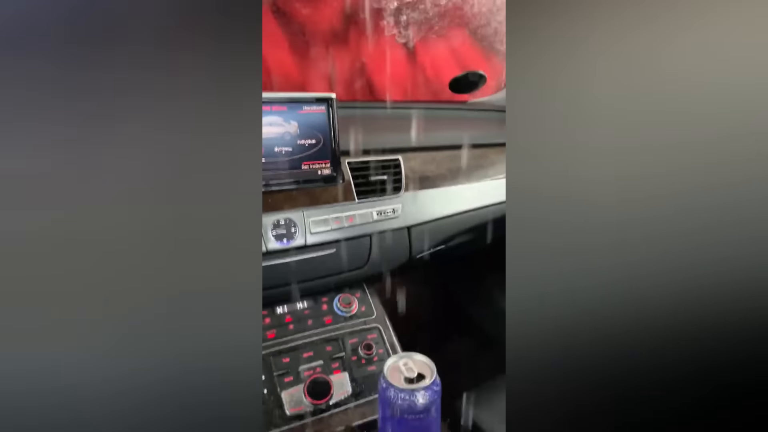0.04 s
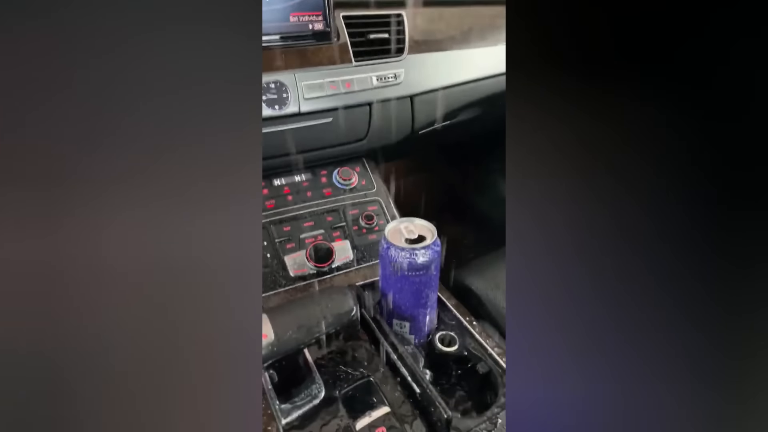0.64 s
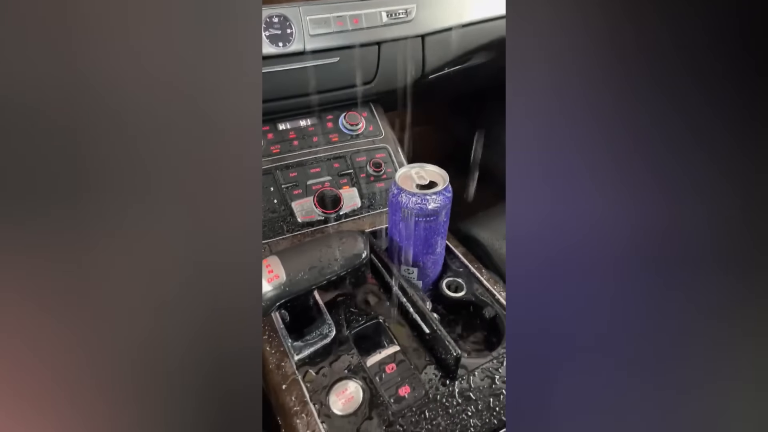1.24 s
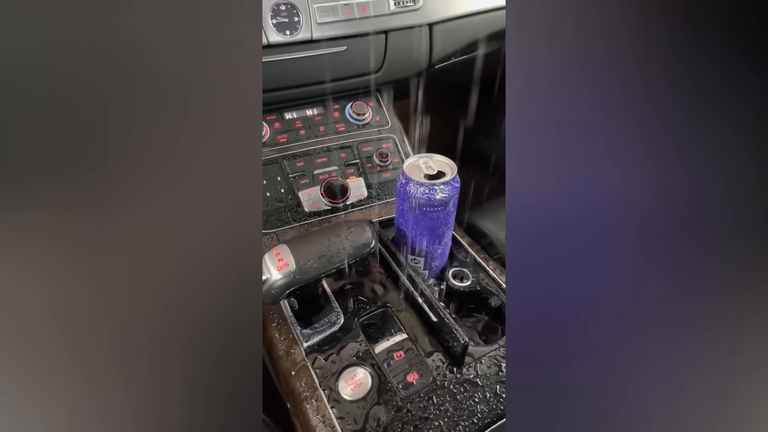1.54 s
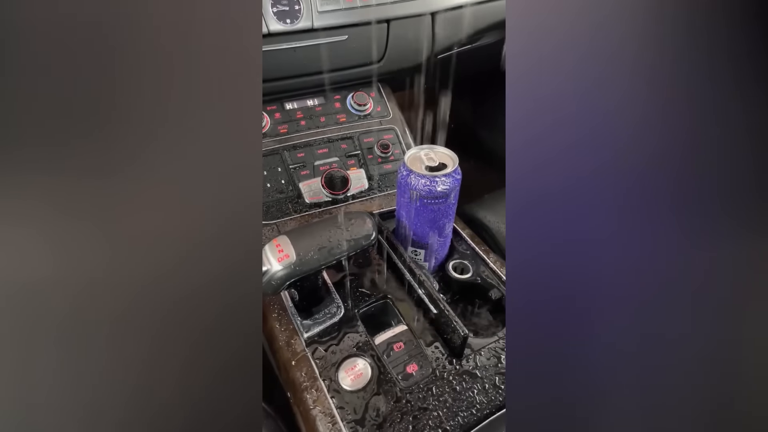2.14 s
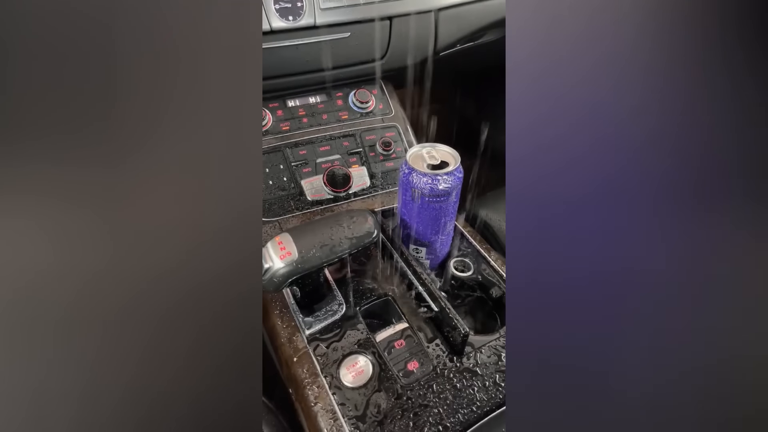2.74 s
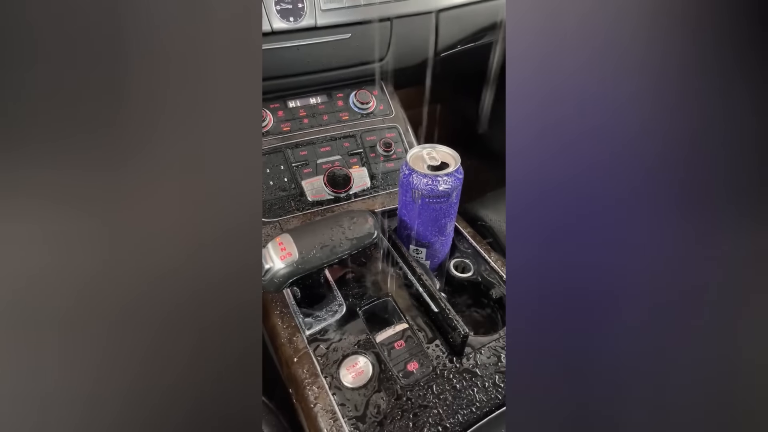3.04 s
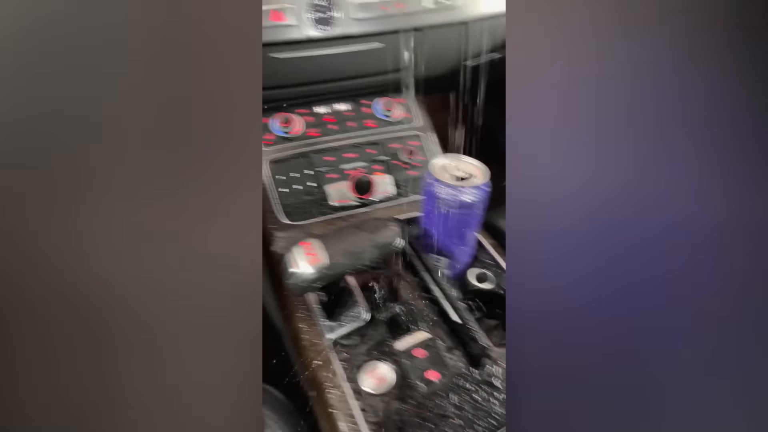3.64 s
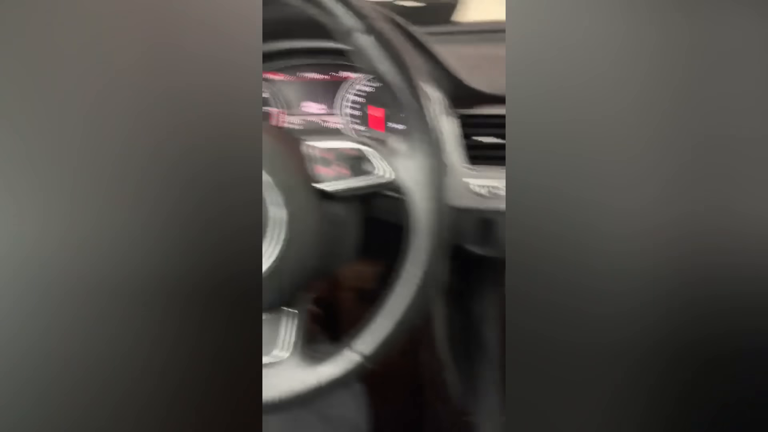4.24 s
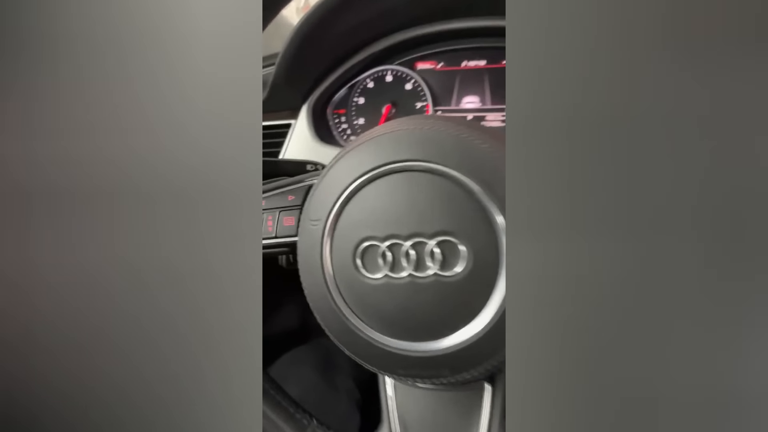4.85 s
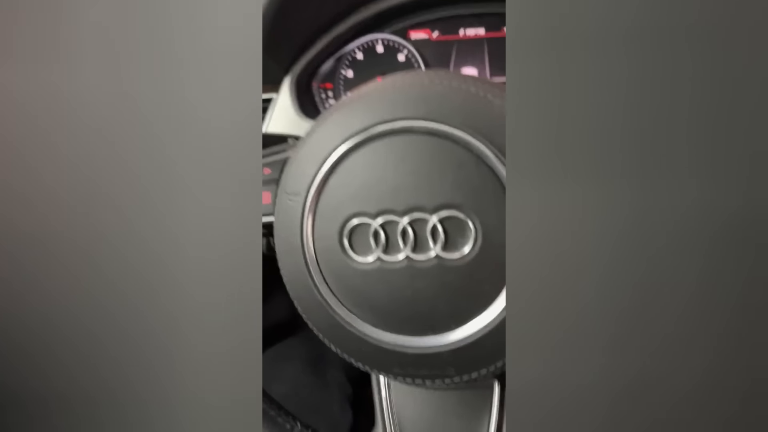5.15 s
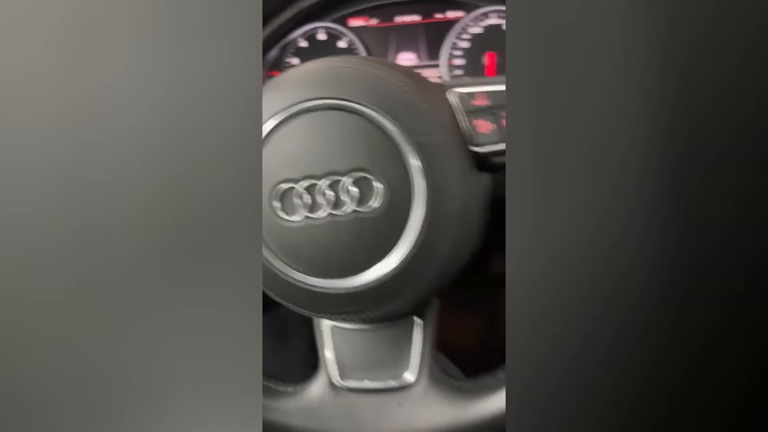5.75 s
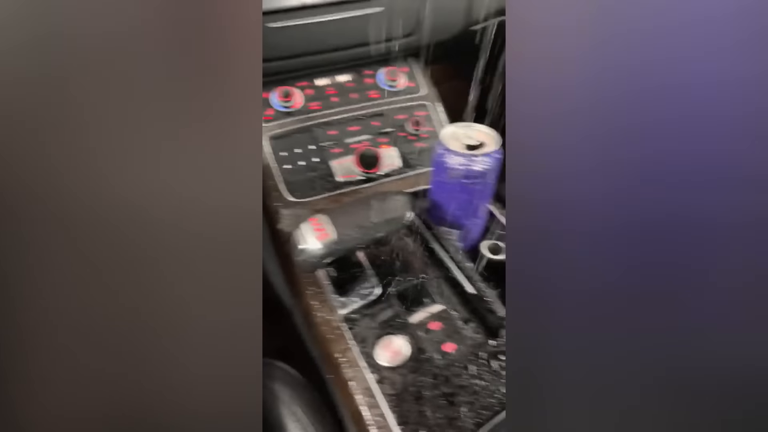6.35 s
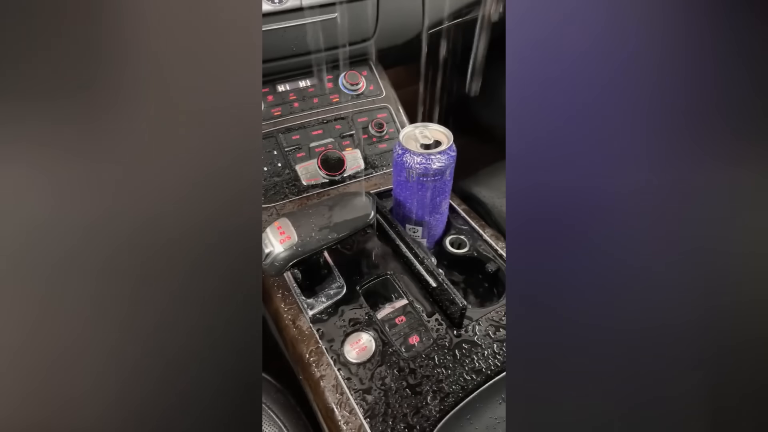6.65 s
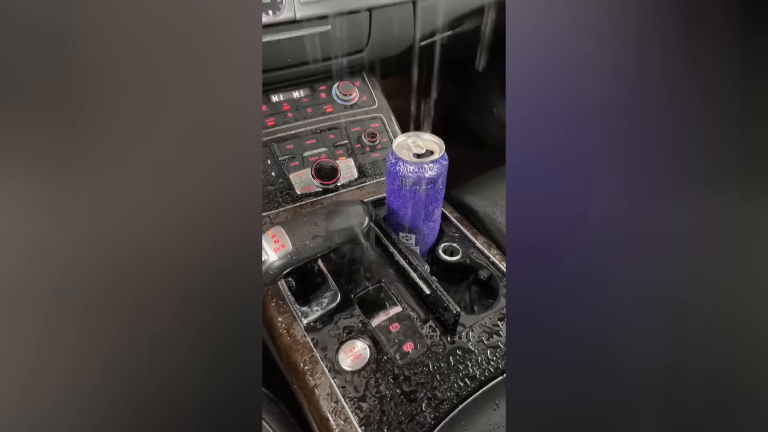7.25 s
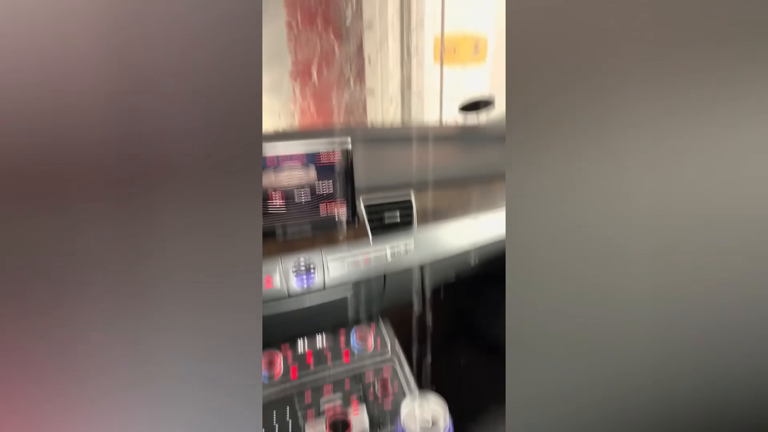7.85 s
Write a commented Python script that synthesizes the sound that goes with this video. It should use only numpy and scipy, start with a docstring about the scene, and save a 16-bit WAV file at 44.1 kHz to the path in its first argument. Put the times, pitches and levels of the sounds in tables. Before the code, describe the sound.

Close drips tick, pat and plink on a car's plastic console as water streams in through the roof, picked up by a phone in the small, dry-sounding cabin. It opens with a loud run of wet cloth thumps and splashes on the body, followed by one short rubber squeak. The dripping then grows lighter, and fine spray swells a few times in the second half. The idling engine and the car wash rumble underneath throughout.

```python
"""Leaking roof in a car wash

Inside an idling car, water leaks through the roof and drums on the hollow centre console.
Drops tick on plastic, pat on wet trim and plink into puddles, close to a phone held in the
small padded cabin. Wet cloths beat the body for the first second and rubber squeaks once;
the wash rumbles and sprays outside."""
import sys
import numpy as np
from scipy import signal
from scipy.fft import rfft, irfft
from scipy.io import wavfile
from scipy.ndimage import uniform_filter1d

SR = 44100
rng = np.random.default_rng(int(sys.argv[2]) if len(sys.argv) > 2 else 0)


def generate_wav(signal):
    """Clip the signal to [-1, 1] and save it as 16-bit WAV at the path in sys.argv[1]."""
    frames = np.transpose(np.atleast_2d(signal))
    scaled = np.clip(frames, -1, 1) * 32767
    pcm = np.round(scaled).astype(np.int16)
    wavfile.write(sys.argv[1], SR, pcm)


N = 356762
TIME_S = np.arange(N) / SR
FREQ_HZ = np.maximum(np.arange(N // 2 + 1) * SR / N, 1)
BRIEF_S = TIME_S[:2048]  # time axis of one drop or cabin response
BRIEF_HZ = np.arange(len(BRIEF_S) // 2 + 1) * SR / len(BRIEF_S) + 1

# drops on hard plastic: start_s, level_db, ring_hz, splash_re_impact_db
PLASTIC_DROPS = [(0.0427, -27.5, 8000, 11.5), (0.0958, -12.5, 8260, -4), (0.2715, -19.5, 6980, -11),
                 (0.345, -20, 9900, -22), (0.4955, -5, 9600, -11), (0.604, -8.5, 10340, -16),
                 (0.6387, -20, 10000, -3), (.782, -14.5, 9200, -3), (0.81, -23, 7660, 7.5),
                 (0.952, -18, 9400, -7), (1.1676, -24, 6650, -4), (1.2278, -21.5, 9650, 1.5),
                 (1.3166, -30, 10700, 1), (1.403, -17.5, 8600, -6), (1.59, -15.5, 6000, 1),
                 (1.8248, -25.5, 10700, -1), (2.0535, -30, 10800, -9), (2.224, -26, 9650, -15),
                 (2.294, -24, 10200, -1), (2.337, -11.5, 8640, -7), (2.432, -28, 9750, -14),
                 (2.522, -30, 6600, 9), (2.674, -21.5, 7050, -2), (2.702, -16.5, 9250, -11),
                 (2.782, -34.5, 7040, 10), (2.8509, -33, 10200, -7), (2.8705, -13, 9600, -0.5),
                 (2.889, -19.5, 10000, 2), (3.088, -22.5, 9000, 1.5), (3.134, -20, 9700, -5),
                 (3.184, -26, 11100, -21), (3.492, -20, 10800, -1), (3.585, -29, 6760, 11.5),
                 (3.788, -20.5, 8250, -10), (3.9474, -20, 10500, -15), (4.0173, -27.5, 6150, -3),
                 (4.1547, -12.5, 10130, -27), (4.606, -11, 9600, -4.5), (4.6415, -26, 10600, -13),
                 (4.8349, -28, 11200, -6), (5.0226, -24, 10000, 2.5), (5.391, -24, 9900, -6),
                 (5.4127, -18.5, 7050, -3), (5.859, -17, 10600, -3), (5.985, -19.5, 11200, -12),
                 (6.336, -22.5, 6940, 2), (6.503, -20, 9650, -5), (6.5684, -21, 10000, -3),
                 (6.7206, -29, 11200, 0), (6.788, -31.5, 11000, -7), (6.845, -30, 10130, 2),
                 (6.892, -18, 9690, -25), (6.9392, -23.5, 11200, 5.5), (7.009, -34.5, 7200, 8),
                 (7.127, -32, 11370, 1), (7.1587, -24, 11000, -3), (7.236, -23.5, 11300, -9),
                 (7.39, -32.5, 11500, 5), (7.5665, -7, 10470, -1), (7.766, -23, 10800, -15),
                 (7.936, -11, 10300, -5)]
# drops into standing water: start_s, level_db, nominal_hz, splat_re_bubble_db, nominal_cycles
PUDDLE_DROPS = [(.237, -17, 600, -14, 6.4), (.352, -21, 4800, -14, 7), (1.4766, -11.5, 4800, -6.5, 6.6),
                (2.18, -23.5, 2550, -3, 3), (2.335, -27.5, 3960, 2, 5), (3.326, -27, 1100, -4, 3),
                (3.343, -20, 1020, -15, 2.4), (3.638, -27.5, 3340, -13, 7), (3.8894, -16.5, 2680, -10, 2.5),
                (4.896, -35, 2870, -10, 7), (5.16, -34, 1470, 2, 6), (5.724, -32.5, 3680, -8, 13),
                (6.017, -29.5, 2780, -11, 6), (6.316, -26, 2420, 0.5, 9.9),
                (6.6189, -17.5, 2520, -10.5, 5.2), (7.217, -20.5, 3320, -3, 9.6)]
# drops on wet trim, no bubble: start_s, level_db, centre_hz, decay_s
TRIM_DROPS = [(0.213, -36.5, 3000, 0.0056), (1.061, -41, 3000, 0.0026), (1.382, -40, 1990, 0.0025),
              (1.589, -39, 2270, .003), (1.902, -38, 2110, .003), (2.06, -45, 2200, 0.0023),
              (2.109, -41, 3800, 0.0018), (2.301, -41, 2000, .002), (2.532, -40, 2300, .003),
              (2.635, -45, 2100, .002), (2.703, -39, 2100, 0.0016), (2.778, -40, 1900, .003),
              (2.7998, -31, 1340, 0.0023), (2.871, -32.5, 3160, 0.0028), (3.13, -28.5, 1430, 0.0011),
              (3.301, -39, 1900, 0.003), (3.393, -38, 3000, 0.0018), (3.49, -35, 1900, 0.0018),
              (3.588, -28.5, 1070, 0.0019), (3.735, -43, 2200, .003), (4.397, -35, 2090, 0.0044),
              (4.756, -36, 3800, 0.0055), (5.075, -44, 1980, .003), (5.381, -37, 3700, 0.0035),
              (5.651, -34, 4000, 0.0047), (6.086, -37, 2570, 0.0033), (6.309, -30.5, 2500, 0.0021),
              (6.335, -34, 2700, 0.0021), (6.453, -39, 2200, .002), (6.586, -36.5, 2220, 0.0025),
              (6.679, -40, 2400, 0.0017), (6.793, -36, 2580, 0.0013), (6.846, -37.5, 1190, .003),
              (6.911, -39, 1200, 0.0026), (6.94, -38.5, 2600, 0.0033), (7.009, -32, 2330, 0.0019),
              (7.119, -36, 1180, 0.004), (7.132, -36, 2480, 0.0021), (7.199, -35, 1200, 0.0023),
              (7.333, -37.5, 2510, 0.0023), (7.392, -31.5, 1280, 0.0018), (7.491, -40, 1160, 0.0027),
              (7.551, -41, 2300, .002), (7.795, -38, 2090, 0.0017), (7.969, -38, 2290, 0.0024)]
# leak strength: time_s, level_db
LEAK_FLOW = [(0, -32), (1.05, -37), (2, -37.5), (2.6, -39), (3.5, -40), (4.7, -42), (5.3, -46.5),
             (5.8, -43.5), (6.7, -45), (7.4, -45), (8.09, -40.5)]
# hollow console resonances: centre_hz, width_hz, level_db
CONSOLE_MODES = [(557, 42, -2.5), (834, 120, -1.5), (1144, 160, 3), (1660, 380, -35), (2230, 390, -8.5),
                 (4150, 1000, -22.5)]
# cloth hits on the body: start_s, boom_db, knock_db, knock_hz, splash_db
CLOTH_SLAPS = [(.003, -15.5, -21, 562, -22), (0.101, -11.5, -23.5, 564, -23), (0.189, -13, -36, 564, -24),
               (.276, -15.5, -17.5, 296.5, -25.5), (0.323, -16, -22, 289, -33),
               (.379, -12.5, -20, 318, -25.5), (.461, -14.5, -25.5, 495, -26.5),
               (.546, -17.5, -21, 347, -24.5), (.626, -14, -19, 312, -30), (.729, -14.5, -34, 522, -28.5),
               (0.825, -13, -23.5, 438, -33)]
# body panel resonances: ratio_to_knock, level_db
PANEL_MODES = [(.76, -7.5), (1, -4.5), (1.27, -10), (1.8, -15.5)]
# surges of fine spray: start_s, length_s, level_db
SPRAY_SURGES = [(3.656, 0.37, -39.5), (4.074, 0.8, -46.5), (5.846, 0.47, -35.5), (7.512, 0.18, -38)]
# noise spectra: freq_hz, level_db
PANEL_SPECTRUM = [(25, -34), (50, -1), (80, 4), (110, 3.5), (132, 12.5), (160, -3), (210, -2), (330, -13.5),
                  (450, -26), (600, -21.5), (900, -49), (2000, -47), (4000, -59), (8000, -80)]
SPLASH_SPECTRUM = [(150, 0.5), (380, 12), (600, 3.5), (1000, -4.5), (1400, -8.5), (1900, -5.5), (2600, -16),
                   (4000, -16), (8000, -22)]
HISS_SPECTRUM = [(600, 9.5), (1600, 2), (2400, 2.5), (3300, 0), (4500, 1), (6500, -1), (8000, 1.5),
                 (11000, -32), (15000, -28)]
FIZZ_SPECTRUM = [(4000, -38), (7000, -16.5), (8500, -14.5), (10200, 0), (11000, -10), (12000, -22),
                 (13500, -23), (16000, -43)]
SURGE_SPECTRUM = [(4000, -22), (7000, -10.5), (8500, -7), (10200, -0.5), (12000, -9), (13500, -11.5),
                  (15000, -20), (16000, -40)]
MACHINE_SPECTRUM = [(20, -32), (35, -28), (65, 5), (100, 0), (140, -5.5), (175, -13), (230, -7.5),
                    (330, -13.5), (460, -25), (600, -21.5), (900, -29.5), (2000, -36), (5000, -59)]
CABIN_BOOM_SPECTRUM = [(60, -34), (88, 4), (122, 7), (152, 10), (185, 5.5), (300, -32)]
# phone heading, 0 = console, 1 = steering wheel: time_s, turn
PHONE_TURN = [(3.4, 0.62), (3.8, 0.75), (4.7, 1), (5.7, 0.91), (6.4, 0.76)]
# sound reaching the two microphone ports from all sides: freq_hz, diffuse_re_common_db
DIFFUSE_SHARE = [(50, -45), (150, -20), (300, -10.5), (520, 6.5), (1000, -3.5), (1800, -15.5), (4000, 10.5),
                 (7000, -32), (9500, -93), (14000, 24)]
# phase between the ports: freq_hz, left_lead_rad
PORT_LEAD = [(100, 0), (250, .2), (420, .7), (600, -1.6), (750, -2.0), (1100, -.9), (1900, .1), (3800, .5),
             (4400, 1.6), (5400, 5.4), (7000, 7.4), (9200, 9.4), (12000, 12.3), (13500, 12.8), (15000, 15)]
# level between the ports: freq_hz, left_minus_right_db
PORT_TILT = [(90, 0), (200, 2.2), (380, 6), (700, 4.5), (1200, .4), (4000, 0)]


def big_drops(tick_gain_db=-5, plink_gain_db=-4, pat_gain_db=1.5, rebound_db=-34):
    """Fat drops hit plastic, puddles and trim; on plastic each throws up a droplet that lands later."""
    ticks, wet = np.zeros((2, N))
    for start_s, level_db, ring_hz, splash_db in PLASTIC_DROPS:
        width_hz = 1900 * 2 ** (splash_db / 13)  # wetter hits damp the ring
        gain = undb(level_db + tick_gain_db)
        add(ticks, start_s, gain * tick(ring_hz, width_hz, splash_db))
        rebound_s = start_s + 0.048 * (0.5 + rng.random())
        add(ticks, rebound_s, gain * undb(rebound_db) * tick(ring_hz, width_hz, splash_db=-5))
    for start_s, level_db, nominal_hz, splat_db, cycles in PUDDLE_DROPS:
        add(wet, start_s, undb(level_db + plink_gain_db) * plink(nominal_hz, splat_db, cycles))
    for start_s, level_db, centre_hz, decay_s in TRIM_DROPS:
        add(wet, start_s, undb(level_db + pat_gain_db) * pat(centre_hz, decay_s))
    return small_source(ticks) + wet


def small_drops():
    """Random patter; ticks grow with the flow, plinks as it thins."""
    ticks, pats, plinks = np.zeros((3, N))
    for when, faintness, pitch in rng.random((640, 3)):
        drop = tick(11200 - 5200 * pitch ** 2, width_hz=1060, splash_db=-10)
        add(ticks, when * N / SR, undb(-37 - 6 * np.log(faintness + 0.23)) * drop)
    for when, faintness, pitch in rng.random((300, 3)):
        drop = pat(1050 * 3.6 ** pitch, decay_s=0.0012)
        add(pats, when * N / SR, undb(-27.5 - 13 * faintness) * drop)
    for when, faintness, pitch in rng.random((160, 3)):
        drop = plink(1000 * 3.4 ** pitch, splat_db=5.5, nominal_cycles=7)
        add(plinks, when * N / SR, undb(-42 - 3.3 * faintness) * drop)
    flow_db = over_time(LEAK_FLOW)
    ticks = small_source(ticks) * undb(0.81 * (flow_db - flow_db.mean()))
    plinks *= undb(0.45 * thinning_db())
    return (ticks + pats + plinks) * facing(console_db=-2, turn_db=-10.5)


def tick(ring_hz, width_hz, splash_db, crack_s=0.0012, splash_s=0.0063, trim_hz=7000):
    """A drop hits plastic: fine snap, tiny ring, crack, then splashed droplets."""
    noise = rng.standard_normal((3, len(BRIEF_S)))
    spot = resonance(BRIEF_HZ, ring_hz, q=ring_hz / (2 * width_hz))
    # broad, heavy hits also wake the trim's resonance
    trim = undb(-11) * width_hz / 1300 * resonance(BRIEF_HZ, trim_hz, q=5)
    band = np.hypot(abs(spot), abs(trim))
    crack, droplets = (unit_rms(irfft(rfft(row) * band)) for row in noise[:2])
    snap = 0.7 * noise[2] * np.exp(-BRIEF_S / 0.0004)
    ring = np.sqrt(2) * bubble(ring_hz, cycles=1.18 * ring_hz / width_hz, glide=0.041, rise_cycles=2.8)
    crack *= 2 * undb(-6) * np.exp(-BRIEF_S / crack_s)
    clumps = unit_rms(undb(7 * unit_rms(uniform_filter1d(noise[2], size=30))))
    splash = np.sqrt(crack_s / splash_s) * clumps * rise_fall(BRIEF_S, crack_s, splash_s)
    return snap + ring + crack + 2 * undb(splash_db) * droplets * splash


def plink(nominal_hz, splat_db, nominal_cycles):
    """A drop enters water: a broad splat and a trapped bubble."""
    cycles = nominal_cycles * min(nominal_hz / 2400, 1) ** 0.5  # large bubbles break after fewer cycles
    ring = bubble(0.976 * nominal_hz, cycles, glide=0.032, rise_cycles=1)
    return ring + undb(splat_db) * splat(nominal_hz, decay_s=0.001, width_ratio=2.6, rise_s=0.0001)


def pat(centre_hz, decay_s):
    """A drop lands on wet trim; softer spots yield more slowly and sound longer."""
    return splat(centre_hz, decay_s, width_ratio=0.72, rise_s=0.067 * decay_s)


def bubble(pitch_hz, cycles, glide, rise_cycles):
    """A trapped bubble rings briefly, its pitch climbing as it nears the surface."""
    elapsed_cycles = pitch_hz * BRIEF_S
    envelope = rise_fall(elapsed_cycles, rise_cycles, cycles)
    climb = 1 + glide * np.tanh(elapsed_cycles / cycles / 2)
    return envelope / envelope.max() * sine(pitch_hz * climb)


def splat(centre_hz, decay_s, width_ratio, rise_s):
    """Water flattens on a surface: a short, broad noise burst."""
    band = resonance(BRIEF_HZ, centre_hz, q=1 / width_ratio) ** 2
    noise = irfft(rfft(rng.standard_normal(len(BRIEF_S))) * band)
    decay_rms = np.sqrt(np.mean(np.exp(-2 * BRIEF_S / decay_s)))
    return unit_rms(noise * rise_fall(BRIEF_S, rise_s, decay_s)) * decay_rms


def small_source(ticks, cutoff_hz=5030):
    """A tiny impact radiates no lows."""
    return signal.sosfilt(signal.butter(3, cutoff_hz, "high", fs=SR, output="sos"), ticks)


def streams(drops_per_s=90):
    """Streams drum on the hollow console: fine beads in full flow, fatter drops as it thins."""
    landings = rng.random((3, N)) < drops_per_s / SR
    size_db = 4.5 * np.minimum(rng.exponential(size=(3, N)), 2.5)
    drops = landings * undb(size_db + 0.24 * thinning_db())
    beads = undb(-33 - thinning_db()) * rng.standard_normal((3, N))
    console = sum((-1) ** k * undb(level_db) * resonance(FREQ_HZ, centre_hz, q=centre_hz / width_hz)
                  for k, (centre_hz, width_hz, level_db) in enumerate(CONSOLE_MODES))
    drumming = at_ports(irfft(rfft(drops + beads) * console, N))
    sway_db = 3 * wander(rate_hz=24)
    return drumming * facing(console_db=-38.2, turn_db=-18.5) * undb(sway_db)


def thinning_db(full_flow_db=-43):
    """Shortfall of the leak below the flow that keeps its streams whole."""
    return np.maximum(full_flow_db - over_time(LEAK_FLOW), 0)


def cloths(swell_s=0.0032, contact_s=0.056, drag_until_s=0.85, slosh_until_s=0.65):
    """Wet cloths slap and drag; panels knock and boom, water splashes and sloshes until shed."""
    blows, knocks, splashes = np.zeros((3, N))
    t = TIME_S[:SR // 3]
    # a cloth pushes while on the panel, then peels off quickly
    blow = (1 - np.exp(-t / swell_s)) * np.exp(-(t / contact_s) ** 4)
    burst = rise_fall(t, 0.0064, 0.014)
    ring = rise_fall(t, 0.009, 0.014)
    for start_s, boom_db, knock_db, knock_hz, splash_db in CLOTH_SLAPS:
        modes = np.zeros(len(t))
        for ratio, level_db in PANEL_MODES:
            mode_hz = knock_hz * ratio * (1 + 0.039 * rng.standard_normal())
            modes += undb(level_db) * np.sin(2 * np.pi * (mode_hz * t + rng.random()))
        add(blows, start_s, undb(boom_db) * blow / blow.max())
        add(knocks, start_s, undb(knock_db) * modes * ring / ring.max())
        add(splashes, start_s, undb(splash_db) * burst / burst.max())
    drag = undb(-23.5 - 34 * np.maximum(TIME_S - drag_until_s, 0))
    slosh = undb(-36.5 - 27 * np.maximum(TIME_S - slosh_until_s, 0))
    panels = noise_field(PANEL_SPECTRUM, grain_db=4)
    # levelled so each blow has its full force
    panels /= np.sqrt(uniform_filter1d(np.mean(panels ** 2, axis=0), size=700))
    water = noise_field(SPLASH_SPECTRUM, grain_db=6)
    return panels * np.hypot(blows, drag) + knocks + water * np.hypot(splashes, slosh)


def spray(fizz_limit_db=-41):
    """Spray hisses and droplets fizz with the flow; surges add airy mist. All three flutter."""
    flutter = wander(rate_hz=21.2)
    flow = undb(over_time(LEAK_FLOW))
    surge = surges()
    # thin flow throws few droplets; strong flow merges into streams and throws no more
    droplets = flow * undb(-0.63 * thinning_db()) / np.hypot(1, flow / undb(fizz_limit_db))
    hiss = noise_field(HISS_SPECTRUM, grain_db=2) * undb(-6 + 2 * flutter) * np.hypot(flow, surge)
    fizz = noise_field(FIZZ_SPECTRUM, grain_db=4.5) * undb(-4 + 3.8 * flutter) * droplets
    mist = noise_field(SURGE_SPECTRUM, grain_db=6) * undb(-1.5 + 2.2 * flutter) * surge
    return hiss + fizz + mist


def surges(rise_s=0.084, fall_s=0.11):
    """Gain of the spray surges: each swells, holds and dies away."""
    gain = np.zeros(N)
    for start_s, length_s, level_db in SPRAY_SURGES:
        swell = 1 - np.exp(-np.maximum(TIME_S - start_s, 0) / rise_s)
        fade = np.exp(-np.maximum(TIME_S - start_s - length_s, 0) / fall_s)
        gain += undb(level_db) * swell * fade
    return gain


def squeak(start_s=1.81, rise_s=0.027, fall_s=0.059, level_db=-41.5, rest_hz=584, climb_hz=130):
    """Wet rubber sticks and slips; its rough, unsteady pitch follows the pressure."""
    t = np.maximum(TIME_S - start_s, 0)
    pressure = (1 - np.exp(-t / rise_s)) * np.exp(-(t / fall_s) ** 2)
    pressure /= pressure.max()
    waver_hz = 65 * wander(rate_hz=160)
    rough_db = 4 * wander(rate_hz=120)
    tone = np.sqrt(2) * sine(rest_hz + climb_hz * pressure + waver_hz)
    return tone * pressure * undb(level_db + rough_db)


def engine_idle(pitch_hz=44.7, level_db=-31.5):
    """The idling engine hums, slightly unsteady in pitch and level."""
    hum = np.sqrt(2) * sine(pitch_hz + 0.16 * wander(rate_hz=3.5))
    return hum * undb(level_db + 0.25 * wander(rate_hz=3.8))


def wash_rumble():
    """The wash churns and booms in the cabin air, which resonates most near the steering wheel."""
    churn_db = 0.6 * wander(rate_hz=8)
    machine = noise_field(MACHINE_SPECTRUM) * facing(console_db=-31.5, turn_db=1) * undb(churn_db)
    boom = noise_field(CABIN_BOOM_SPECTRUM) * facing(console_db=-55.5, turn_db=19)
    return machine + boom


def cabin(x, echo_db=-11, tail_db=-11, t60_s=0.027):
    """Console and dashboard return quick echoes; seats and carpet absorb the rest."""
    response = rng.standard_normal((2, len(BRIEF_S))) * undb(-60 * BRIEF_S / t60_s) * (BRIEF_S > 0.002)
    response *= undb(tail_db) / np.sqrt(np.sum(response ** 2) / 2)
    response[:, 0] += 1
    for k, lag_s in enumerate([0.0023, 0.0041, 0.0072]):
        response[:, int(lag_s * SR)] += undb(echo_db - k)
    return signal.fftconvolve(x[None], response, axes=1)[:, :N]


def facing(console_db, turn_db):
    """Source gain as the phone turns from console to steering wheel."""
    return undb(console_db + turn_db * over_time(PHONE_TURN))


def noise_field(spectrum, grain_db=0):
    """Coloured stereo noise, rms 1; grain makes it uneven, like countless impacts."""
    impacts = rng.standard_normal((3, N)) * undb(grain_db * rng.standard_normal((3, N)))
    return at_ports(irfft(rfft(impacts) * undb(over_freq(spectrum)), N))


def at_ports(sounds):
    """Of three like sounds the first reaches both ports, the others one each; rms 1."""
    spectra = rfft(sounds)
    diffuse = undb(over_freq(DIFFUSE_SHARE))
    return unit_rms(irfft((spectra[0] + diffuse * spectra[1:]) / np.hypot(1, diffuse), N))


def resonance(freq_hz, centre_hz, q):
    """Complex band-pass response of one mode."""
    return 1 / (1 + 1j * q * (freq_hz / centre_hz - centre_hz / freq_hz))


def rise_fall(t, rise, fall):
    """Exponential attack and decay; constants in the unit of t."""
    return (1 - np.exp(-t / rise)) * np.exp(-t / fall)


def sine(pitch_hz):
    """Sine following a per-sample pitch."""
    return np.sin(2 * np.pi * np.cumsum(pitch_hz) / SR)


def wander(rate_hz):
    """Smooth random drift, rms 1."""
    return unit_rms(irfft(rfft(rng.standard_normal(N)) / (1 + (FREQ_HZ / rate_hz) ** 4), N))


def over_time(table):
    """A time table at every sample."""
    time_s, value = np.transpose(table)
    return np.interp(TIME_S, time_s, value)


def over_freq(table):
    """A frequency table at every bin, on a log axis."""
    freq_hz, value = np.transpose(table)
    return np.interp(np.log(FREQ_HZ), np.log(freq_hz), value)


def add(track, start_s, sound):
    """Mix a short sound into a track."""
    i = int(np.clip(start_s * SR, 0, N - 1))
    track[i:i + len(sound)] += sound[:N - i]


def undb(db):
    """Decibels to gain."""
    return 10 ** (np.asarray(db) / 20)


def unit_rms(x):
    """Scale to rms 1."""
    return x / np.sqrt(np.mean(x ** 2))


def scene():
    """Drops in the cabin over streams, spray, cloths, a squeak, engine and wash."""
    drops = cabin(big_drops() + small_drops())
    return drops + streams() + spray() + cloths() + squeak() + engine_idle() + wash_rumble()


def record(dry, roll_off_hz=11480, clip_level=0.9, top_hz=16000):
    """The phone's two ports differ in phase and level; peaks are rounded, the top is cut."""
    side = np.array([[0.5], [-0.5]])
    ports = undb(side * over_freq(PORT_TILT)) * np.exp(1j * side * over_freq(PORT_LEAD))
    heard = irfft(rfft(dry) * ports, N)
    heard = signal.sosfilt(signal.butter(5, roll_off_hz, fs=SR, output="sos"), heard)
    heard = heard / (1 + (heard / clip_level) ** 6) ** (1 / 6)
    return signal.sosfilt(signal.ellip(8, 0.2, 80, top_hz, fs=SR, output="sos"), heard)


dry = scene()
out = record(dry)
generate_wav(out)
```